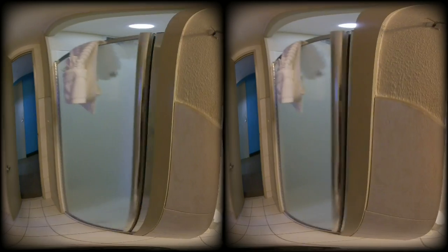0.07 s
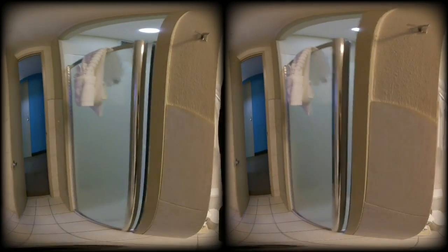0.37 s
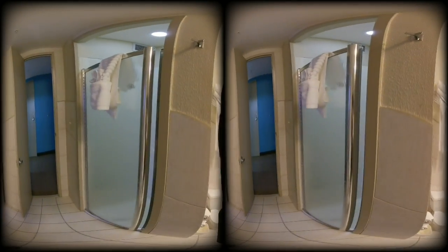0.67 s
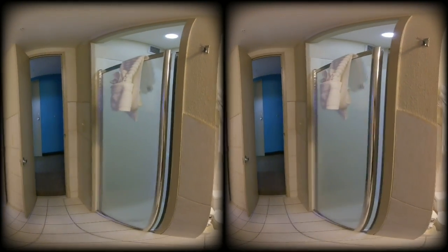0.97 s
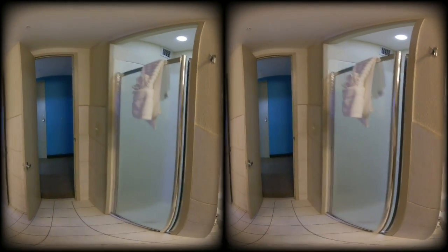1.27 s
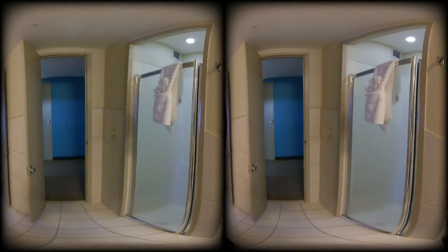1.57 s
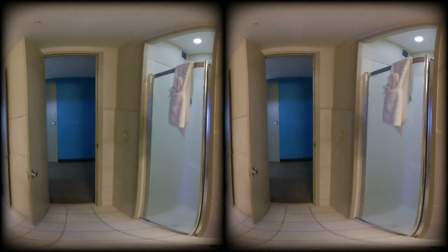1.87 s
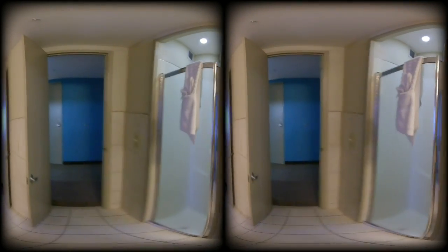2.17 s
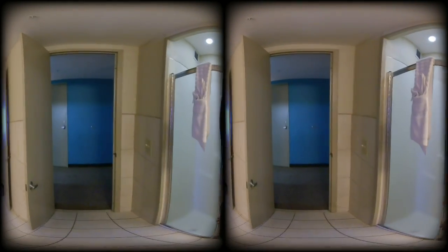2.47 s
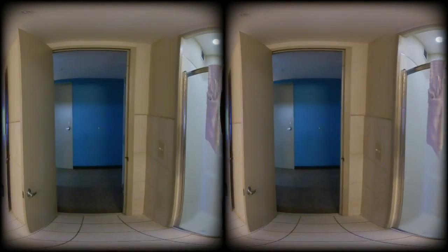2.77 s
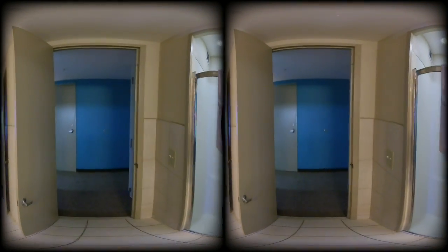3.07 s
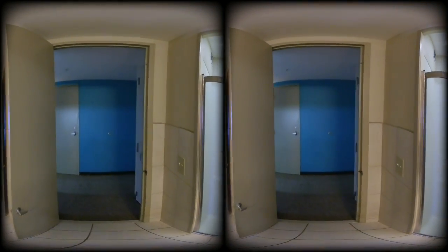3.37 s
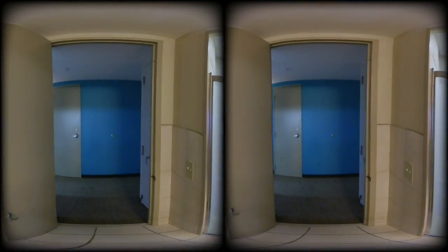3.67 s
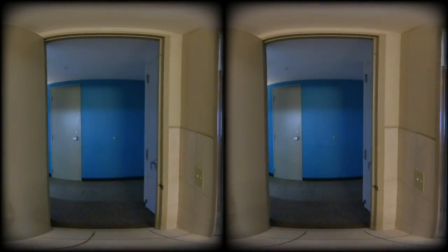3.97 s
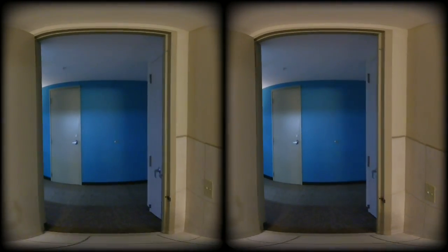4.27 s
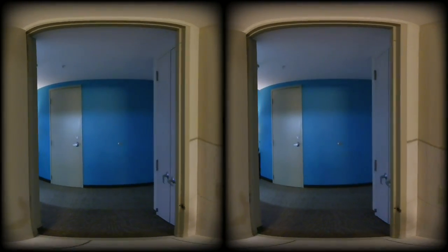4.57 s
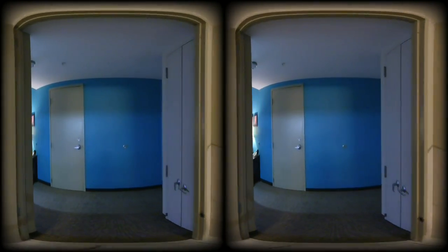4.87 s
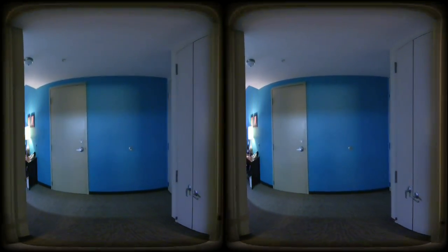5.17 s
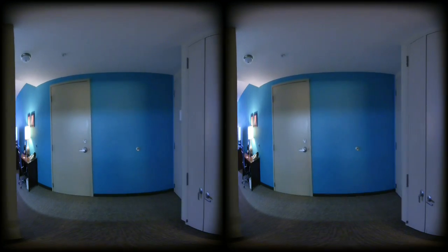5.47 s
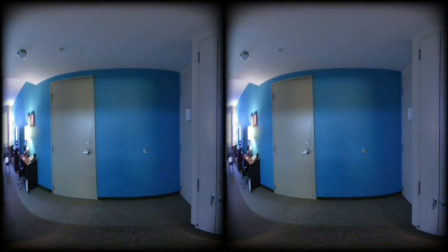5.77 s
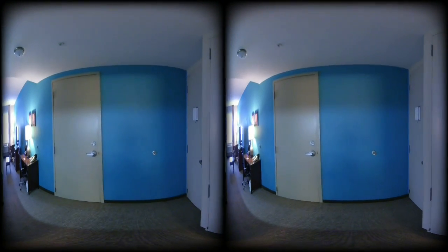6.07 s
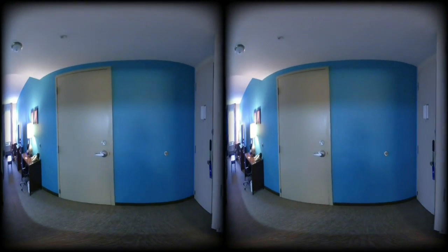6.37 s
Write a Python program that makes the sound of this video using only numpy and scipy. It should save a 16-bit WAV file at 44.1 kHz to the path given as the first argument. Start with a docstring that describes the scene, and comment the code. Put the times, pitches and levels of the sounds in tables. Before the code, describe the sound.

A quiet ventilation hum with rushing air runs throughout, easing slightly, heard from a hand-held stereo microphone in a tiled bathroom. After a faint scuff, a shower door clatters shut at about 0.2 seconds, the loudest sound: its steel catch snaps, its metal frame rattles, and duller rebounds die away by 0.5 seconds with a short, hard echo. From 0.9 to 2.4 seconds fingers click and rub softly on the microphone's case, close and slightly left. A soft step lands at 1 second, with faint scuffs near 2.2 and 3.2. At 3.6 seconds a wooden door knocks against its frame, nearly as loud, its latch snapping in and the room booming briefly. Quiet scuffs follow just after 4 seconds, then soft, slightly creaky steps from 4.7 to 5.2. Near 5.8 seconds come a light heel thud, a tiny sole squeak and a scuff on carpet.

```python
"""A slow walk out of a tiled bathroom, heard from the stereo microphones of a hand-held camera.
Ventilation hums from the start; close on the left, fingers rub and click on the case, and a sole scuffs.
At 0.2 s a shower door clatters shut, its steel catch and frame rattling in the hard room.
Soft steps follow. At 3.6 s a wooden door is knocked against its frame and its latch snaps in.
The air recedes, and near 5.8 s a sole squeaks and the walk reaches carpet."""
import sys
import numpy as np
from scipy import signal
from scipy.fft import rfft, irfft
from scipy.io import wavfile
from scipy.ndimage import uniform_filter1d

SR = 44100
rng = np.random.default_rng(int(sys.argv[2]) if len(sys.argv) > 2 else 0)


def inscribe(sig):
    """Save sig as 16-bit PCM at rate SR to the path in sys.argv[1].

    A 1-D sig is mono; a 2-D sig holds one channel per row.
    Samples are clipped to [-1, 1] before scaling.
    """
    pcm = np.round(np.clip(np.atleast_2d(sig).T, -1, 1) * 32767)
    wavfile.write(sys.argv[1], SR, pcm.astype(np.int16))


N = 282681
TIME = np.arange(N) / SR


def undb(db):
    """Decibels to gain."""
    return 10 ** (np.asarray(db) / 20)


def on_log_axis(hz, points):
    """Join (Hz, value) points by straight lines over log frequency."""
    f, value = np.transpose(points)
    return np.interp(np.log(np.maximum(hz, 1)), np.log(f), value)


def unit(x):
    """Scale to an average energy of one per channel."""
    return x / np.sqrt(np.mean(np.sum(x ** 2, axis=-1)))


def add(out, s, x, db, size=512):
    """Mix a stereo sound in at s seconds; db is the level of its loudest hundredth of a second."""
    start = max(int(s * SR), 0)
    loudest = np.sqrt(uniform_filter1d(np.mean(x ** 2, axis=0), size, mode="constant").max())
    out[:, start:start + x.shape[1]] += x[:, :N - start] * undb(db) / loudest


def pan(x, left_db):
    """Lean a sound toward the left microphone by a level difference."""
    return x * undb([[left_db / 2], [-left_db / 2]])


def through(x, response):
    """Convolve, channel by channel."""
    return signal.fftconvolve(np.atleast_2d(x), np.atleast_2d(response), axes=1)


def soften(x, hz):
    """Gentle low-pass: a softer contact pushes for longer."""
    return signal.lfilter(*signal.butter(1, min(hz, SR / 2 - 2000), fs=SR), x)


def thin(x, hz):
    """Gentle high-pass: a light touch hardly moves the whole panel."""
    return signal.lfilter(*signal.butter(1, hz, "high", fs=SR), x)


def high_pass(x, hz):
    """Remove what lies below hz."""
    return signal.sosfilt(signal.butter(3, hz, "high", fs=SR, output="sos"), x)


def body(points, size=4096):
    """Causal impulse response with the given (Hz, dB) spectrum."""
    gain = undb(on_log_axis(np.fft.rfftfreq(size, 1 / SR), points))
    cepstrum = irfft(np.log(gain))
    cepstrum[1:size // 2] *= 2
    cepstrum[size // 2 + 1:] = 0
    return unit(irfft(np.exp(rfft(cepstrum))))


def ring(modes):
    """One second of modes (Hz, energy in dB, t60: seconds to fall by 60 dB)."""
    t = np.arange(SR) / SR
    return sum(undb(db) * unit(np.sin(2 * np.pi * hz * t) * np.exp(-np.log(1000) * t / t60))
               for hz, db, t60 in modes)


def detune(modes, spread):
    """Each new contact shifts an object's modes a little."""
    shifts = rng.standard_normal(len(modes))
    return [(hz * (1 + spread * shift), db, t60) for (hz, db, t60), shift in zip(modes, shifts)]


def struck(spectrum, modes):
    """A blow's response: a broad crack plus the modes that ring on."""
    crack = body(spectrum)
    return np.pad(crack, (0, SR - len(crack))) + ring(modes)


def diffuse(size, side_db):
    """Stereo white noise; side_db lists its width as (Hz, side minus mid in dB) points."""
    ratio = undb(on_log_axis(np.fft.rfftfreq(size, 1 / SR), side_db))
    mid, side = rfft(rng.standard_normal((2, size))) / np.sqrt(1 + ratio ** 2)
    return irfft(np.array([mid + ratio * side, mid - ratio * side]), size)


def wander(rate_hz):
    """Smooth random drift with a spread near one."""
    hold = max(int(SR / rate_hz), 2)
    held = np.repeat(rng.standard_normal(N // hold + 1), hold)
    smooth = uniform_filter1d(uniform_filter1d(held, hold), hold)[:N]
    return smooth / smooth.std()


def slide_envelope(length_s, attack_s, release_s):
    """A surface presses down, slides for length_s and comes to rest."""
    t = np.arange(SR) / SR
    return np.minimum(t / attack_s, 1) * np.exp(-np.maximum(t - length_s, 0) / release_s)


def friction(envelope, grain_db, catch_db, size=128):
    """A swell of tiny uneven slips; the surface catches and lets go every few milliseconds."""
    slips, sizes, catches = rng.standard_normal((3, len(envelope)))
    grip = uniform_filter1d(catches, size) * np.sqrt(size)
    return slips * undb(grain_db * sizes + catch_db * np.tanh(grip)) * envelope


# The tiled room's decay. Each row: frequency in Hz, t60 in seconds.
ROOM_T60 = [(50, 1), (150, 0.62), (400, 0.72), (1200, 0.77), (3000, 0.75), (5500, 0.58), (9000, 0.5)]
# The room's width at the microphones. Each row: frequency in Hz, side minus mid in dB.
ROOM_WIDTH = [(50, -21.5), (150, -33.5), (500, -19.5), (1000, -9.5), (2200, -2), (4500, -1.5), (8500, -9)]


def reverb(liveness, bands=14):
    """The room's dense tail, treble dying first; liveness scales the decay times for the source's spot."""
    t, hz = np.arange(SR) / SR, np.fft.rfftfreq(SR, 1 / SR)
    noise, centres = rfft(diffuse(SR, ROOM_WIDTH)), np.geomspace(50, 10000, bands)
    tail = 0
    for centre, share in zip(centres, np.eye(bands)):
        band = irfft(noise * np.interp(hz, centres, share), SR)
        build_up = 1 - np.exp(-t / (0.0017 + 0.73 / centre))  # low modes need some cycles to fill
        t60 = liveness * on_log_axis(centre, ROOM_T60)
        tail = tail + band * build_up * np.exp(-np.log(1000) * t / t60)
    return unit(tail)


def room(direct_db, liveness, contact_s=0.00077, size=512):
    """Surfaces meet at many points: a short burst reaches the microphones, direct_db above the tail."""
    age = np.arange(size) / SR / contact_s
    direct = unit(diffuse(size, ROOM_WIDTH) * age * np.exp(-age))
    return reverb(liveness) + undb(direct_db) * np.pad(direct, ((0, 0), (0, SR - size)))


# Moving air at the microphones. Each row: frequency in Hz, level in dB.
AIR_SPECTRUM = [(25, -20), (60, -22), (100, -11), (135, -12.5), (168, -13.5), (200, -12), (240, -14.5),
                (330, -15), (500, -14), (1300, -14.5), (1650, -19.5), (2300, -25.5), (4500, -30.5),
                (9800, -34)]
# Stereo width of the steady hiss, nearly mono at the top.
# Each row: frequency in Hz, side minus mid in dB.
HISS_WIDTH = [(50, -19), (200, -13), (600, -10), (1200, -4), (2400, -2.5), (4500, 0.5), (7000, -16)]
# Duct resonances. Each row: frequency in Hz, width in Hz, starting level in dB, fade in dB per second.
DUCT_MODES = [(158.4, 4.3, -72.5, 1), (237, 7.7, -76, -0.73), (260.5, 14, -67, 3.5)]


def ventilation(start_db=-63.5, air_fade_db_per_s=0.65, steady_tone=0.35):
    """Rushing air keeps the duct humming unevenly; all fades with distance but one tone, which grows."""
    air_db = start_db - air_fade_db_per_s * TIME + 0.5 * wander(5.31)
    air = through(diffuse(N, HISS_WIDTH), body(AIR_SPECTRUM))[:, :N] * undb(air_db)
    hum = 0
    for hz, width_hz, db, fade_db_per_s in DUCT_MODES:
        waver = steady_tone + wander(2 * width_hz) + 1j * wander(2 * width_hz)
        tone = (waver * np.exp(2j * np.pi * hz * TIME)).real
        hum = hum + tone * undb(db - fade_db_per_s * TIME)
    return pan(air + hum, left_db=0.4)


# Strokes on the case. Each row: start in seconds, length in seconds, level in dB, cut-off in Hz.
RUBS = [(0.032, 0.0081, -58, 9100), (1.147, 0.061, -55.5, 14100), (1.218, 0.044, -51.5, 8000),
        (1.354, 0.079, -62, 2500), (1.495, 0.018, -58.5, 3960), (1.599, .06, -61, 4500),
        (1.685, 0.021, -56, 5500), (1.741, 0.038, -57, 10000), (1.975, 0.09, -57.5, 3500),
        (2.057, 0.0926, -51.5, 9900), (2.154, 0.13, -59, 6000), (2.292, 0.1, -63.5, 4000)]
# Clicks under the fingers. Each row: start in seconds, level in dB, contact cut-off in Hz.
CLICKS = [(0.8955, -44.5, 5800), (0.9216, -49, 16000), (1.704, -59, 3500), (1.9316, -53.5, 2510)]
# The plastic case's modes. Each row: frequency in Hz, level in dB, t60 in seconds.
CASE_MODES = [(1142, -23.5, 0.071), (1628, -23.5, 0.087), (2343, -13.5, 0.077), (3060, -19, 0.098),
              (4580, -20, 0.035)]
# Paths through the case to each microphone. Each row: frequency in Hz, level in dB.
CASE_LEFT = [(500, -26), (800, -17), (1080, 1.5), (1550, 4), (1750, 3.5), (2050, -22.5), (2500, -5.5),
             (3100, -1.5), (3700, -8), (4400, -2.5), (5300, -6.5), (6800, -12), (8200, -6), (10000, -17)]
CASE_RIGHT = [(500, -13), (850, -20), (1180, 6.5), (1450, 2.5), (1750, -17.5), (2100, -19.5), (2700, -0.5),
              (3100, -3.5), (3700, -14.5), (4600, -21.5), (10000, -33)]


def hand():
    """Rubs and clicks travel through the case to the microphones, too close to wake the room."""
    out = np.zeros((2, N))
    shell = np.array([body(CASE_LEFT), undb(-2.5) * body(CASE_RIGHT)])  # right is further from the hand
    for s, db, contact_hz in CLICKS:
        add(out, s, soften(disperse(shell, lag_s=0.0008), contact_hz), db)
    for s, length_s, db, bright_hz in RUBS:
        stroke = slide_envelope(length_s, attack_s=0.34 * length_s, release_s=0.018)
        slide = friction(stroke, grain_db=4.0, catch_db=2)
        singing = through(slide, ring(detune(CASE_MODES, spread=0.056)))[0, :len(slide)]
        add(out, s, through(soften(slide + singing, bright_hz), shell), db)
    return out


def disperse(x, lag_s):
    """Bending waves in a thin shell: treble arrives first, 1 kHz comes lag_s late."""
    khz = np.fft.rfftfreq(x.shape[-1], 1000 / SR)
    return irfft(rfft(x) * np.exp(-4000j * np.pi * lag_s * np.sqrt(khz)))


# Slides on the floor below the camera.
# Each row: start in seconds, length in seconds, level in dB, cut-off in Hz, attack in seconds.
SCUFFS = [(0.057, 0.071, -55, 2900, 0.037), (2.17, 0.13, -61, 4000, 0.039), (3.173, 0.088, -55, 2500, 0.02),
          (4.046, 0.1, -59, 3400, 0.023), (4.125, 0.061, -55.5, 2870, 0.018),
          (4.234, 0.078, -56.5, 5000, 0.023), (5.029, 0.18, -60.5, 8040, 0.077),
          (5.821, 0.017, -67, 8000, .02), (5.911, 0.054, -54, 6050, .016)]
# A sole on each surface. Each row: frequency in Hz, level in dB.
SOLE_ON_TILE = [(60, -9), (200, -16), (500, -4.5), (900, -2), (1200, 0), (1650, -1), (2100, -9),
                (2600, -5.5), (3350, -7), (3850, -12), (6500, -13.5), (10000, -21.5)]
SOLE_ON_CARPET = [(60, -14), (200, -20), (500, -8.5), (900, -2.5), (1250, 0), (1650, -0.5), (2000, -6),
                  (2600, -3.5), (3400, -2.5), (3850, -12.5), (6500, -17.5), (10000, -25)]


def scuffs(carpet_from_s=5.5):
    """Soles catch and slip between the steps, on tiles and then on carpet."""
    out, tile, carpet = np.zeros((2, N)), body(SOLE_ON_TILE), body(SOLE_ON_CARPET)
    for s, length_s, db, bright_hz, attack_s in SCUFFS:
        slide = friction(slide_envelope(length_s, attack_s, release_s=0.013), grain_db=3.0, catch_db=4.5)
        floor = through(carpet if s > carpet_from_s else tile, room(direct_db=4.0, liveness=1.0))
        add(out, s, through(soften(soften(slide, bright_hz), bright_hz), floor), db)
    return out


def door(blows, spectrum, modes, liveness):
    """A door meets its frame and rebounds; after each blow the door rings and the room booms."""
    out, response = np.zeros((2, N)), struck(spectrum, modes)
    for s, db, contact_hz, direct_db, low_cut_hz in blows:
        blow = thin(soften(response, contact_hz), low_cut_hz)
        add(out, s, through(blow, room(direct_db, liveness)), db)
    return out


# The shower door, near centre: the catch ticks, the door slams, the pane rebounds.
# Each row: start in seconds, level in dB, direct sound in dB, low cut in Hz.
SHOWER_BLOWS = [(0.1633, -54, 16, 2500), (0.1672, -49.5, 12.5, 347), (0.1707, -48, 14.5, 600),
                (.183, -45, -6, 250), (.192, -51, 7.5, 298), (.205, -53, -0.5, 200.4),
                (.2150, -28, -15, 30.4), (0.2294, -25.5, -0.5, 30), (0.2407, -34.5, -2.5, 120),
                (.262, -35.5, -7.5, 60), (0.2676, -32.5, 2.5, 90), (.2745, -33.5, 0, 149),
                (0.378, -37.5, 16, 200), (0.457, -52, -11, 250), (0.485, -45.5, -16, 350)]
# Its crack. Each row: frequency in Hz, level in dB.
SHOWER_CRACK = [(21, -20.5), (35, -15.5), (59, 0), (120, -10), (216, 1), (294, -5), (610, -5.5), (840, -1),
                (1620, -3.5), (2200, -13), (3060, -12.5), (3500, -16.5), (5940, -15.5), (8680, -12),
                (10000, -16.5), (13000, -57.5), (22000, -120)]
# The door's ring and the room's low boom after each blow.
# Each row: frequency in Hz, level in dB, t60 in seconds.
SHOWER_AND_ROOM_MODES = [(48.4, -21, 0.45), (119, -28, 0.065), (218, -27.5, 0.2), (333, -23, .7),
                         (472, -29, 0.42), (961, -26, 0.011), (1160, -19, 0.0093), (2930, -18, 0.011)]


def shower_door(slam_s=0.22, hardest_hz=11000, softest_hz=1470, halving_s=0.024):
    """Contact is hard up to the slam; after it the rebounds grow softer and duller."""
    blows = []
    for s, db, direct_db, low_cut_hz in SHOWER_BLOWS:
        contact_hz = hardest_hz * 0.5 ** (max(s - slam_s, 0) / halving_s)
        blows.append((s, db, max(contact_hz, softest_hz), direct_db, low_cut_hz))
    return pan(door(blows, SHOWER_CRACK, SHOWER_AND_ROOM_MODES, liveness=1.02), left_db=-0.4)


def chinks(hits, modes):
    """A small steel part strikes its plate; each mode beams its own way and carries into the room."""
    out = np.zeros((2, N))
    for s, db, direct_db in hits:
        partials = [ring([mode]) for mode in detune([mode[:3] for mode in modes], spread=0.012)]
        direct = sum(pan(partial, left_db=mode[3]) for partial, mode in zip(partials, modes))
        tail = through(sum(partials), reverb(liveness=0.85))[:, :SR]
        add(out, s, undb(direct_db) * direct + tail, db)
    return out


# The catch's snaps. Each row: start in seconds, level in dB, direct sound in dB.
CATCH_HITS = [(.2225, -34, 0.75), (.2285, -31, 3), (.2665, -38, 4), (.279, -45, 4)]
# Its modes. Each row: frequency in Hz, level in dB, t60 in seconds, left minus right in dB.
CATCH_MODES = [(3130, -2, .015, -10), (3580, 3, 0.018, 0), (3830, 1, .015, 0.5), (4300, 1.5, 0.012, -0.5),
               (4640, -5, 0.012, 0.5), (6800, -10.5, 0.006, -0.5), (8470, -3.5, .012, 0)]


def shower_catch():
    """The shower door's steel catch snaps against its plate."""
    return chinks(CATCH_HITS, CATCH_MODES)


def frame_rattle():
    """After the slam the shower door's loose metal frame chatters brightly and settles."""
    envelope = slide_envelope(length_s=0.046, attack_s=0.0072, release_s=0.021)
    chatter = high_pass(friction(envelope, grain_db=2.5, catch_db=3), hz=5000)
    out = np.zeros((2, N))
    add(out, 0.228, through(chatter, room(direct_db=8, liveness=0.65)), db=-39.5)
    return out


# Heels landing below the camera.
# Each row: start in seconds, level in dB, creak in Hz, thud against creak in dB, direct sound in dB.
STEPS = [(1.0124, -53.5, 620, 9, -5.5), (1.044, -61, 500, -4, 3), (4.741, -64, 1570, -15, -14),
         (4.81, -52.5, 1110, 8, -3), (4.8849, -50, 1470, -24, -8), (4.918, -62.5, 1380, -22, -9),
         (4.962, -60, 1540, -19, 5), (5.175, -59, 830, -6.5, 4), (5.655, -71, 550, -11, 3),
         (5.7625, -61.5, 1110, 12, -1)]
# A heel's thud. Each row: frequency in Hz, level in dB.
HEEL_THUD = [(40, -24), (80, -24), (230, 13), (500, 2), (1000, 0), (1600, 2.5), (2200, -19), (3200, -4),
             (5000, -44), (10000, -64)]
# The floor's boom. Each row: frequency in Hz, level in dB, t60 in seconds.
FLOOR_MODES = [(242, -4, 0.083), (122, -21.5, 0.053)]


def footsteps(creak_t60_s=0.0043, contact_hz=2650):
    """Heels thud and make the floor boom and creak; a creak is a broad, short resonance."""
    out, thud, sole = np.zeros((2, N)), struck(HEEL_THUD, FLOOR_MODES), body(SOLE_ON_TILE)
    for s, db, creak_hz, thud_db, direct_db in STEPS:
        creak = unit(through(ring([(creak_hz, 0, creak_t60_s)]), sole)[0, :len(thud)])
        step = soften(creak + undb(thud_db) * thud, contact_hz)
        add(out, s, through(step, room(direct_db, liveness=0.81)), db)
    return out


# The wooden door, further along the walk.
# Each row: start in seconds, level in dB, contact cut-off in Hz, direct sound in dB, low cut in Hz.
WOOD_BLOWS = [(3.566, -34, 11000, -10, 900), (3.5722, -30.5, 4940, -6.5, 200), (3.5862, -32.5, 2980, 2, 60),
              (3.5995, -34, 1480, 11, 250), (3.634, -35, 1100, -1.5, 40), (3.697, -38.5, 1100, 2.5, 60),
              (3.765, -44.5, 6500, -5, 90), (3.785, -48.5, 14000, -1.5, 200)]
# Its crack. Each row: frequency in Hz, level in dB.
WOOD_CRACK = [(21, -47), (35, -2), (102, -12.5), (145, -12), (202, -7.5), (324, -11), (420, -5.5),
              (690, -10.5), (961, -1), (1620, -11), (2250, -19.5), (3290, -14), (4690, -20.5), (7890, -20),
              (10000, -20.5), (13000, -45), (22000, -120)]
# The door's ring and the room's low boom after each blow.
# Each row: frequency in Hz, level in dB, t60 in seconds.
WOOD_AND_ROOM_MODES = [(57.3, -23, 0.99), (165.3, -16, 0.55), (325.5, -15, 0.6), (501, -22, 0.5),
                       (1000, -26, 0.037), (1290, -13, 0.012), (1543, -16.5, 0.055)]


def wooden_door():
    """The wooden door knocks against its frame and sets the room booming."""
    return pan(door(WOOD_BLOWS, WOOD_CRACK, WOOD_AND_ROOM_MODES, liveness=0.84), left_db=0.5)


# The latch's hits, more direct than room. Each row: start in seconds, level in dB, direct sound in dB.
LATCH_HITS = [(3.5658, -34.5, 14), (3.5785, -46, 8), (3.587, -41.5, 5.2), (3.608, -47, 11),
              (3.626, -44.5, 5)]
# Its modes. Each row: frequency in Hz, level in dB, t60 in seconds, left minus right in dB.
LATCH_MODES = [(3125, 3.5, 0.025, -7), (4130, -23, 0.014, 0), (4396, -0.5, 0.041, 16), (6230, -21, .01, 0),
               (8060, -26, .008, -3)]


def door_latch():
    """The wooden door's steel latch snaps in and rattles."""
    return chinks(LATCH_HITS, LATCH_MODES)


# A squeak underfoot, dead centre.
# Each row: start in seconds, length in seconds, level in dB, first pitch in Hz, last pitch in Hz.
SQUEAKS = [(5.767, 0.023, -66, 1436, 1795)]


def sole_squeak(glide_s=0.0112):
    """A sole grips and sings for a moment, its pitch rising quickly and levelling off."""
    out, t = np.zeros((2, N)), np.arange(SR) / SR
    for s, length_s, db, start_hz, end_hz in SQUEAKS:
        glide_hz = end_hz + (start_hz - end_hz) * np.exp(-t / glide_s)
        hz = glide_hz * (1 + 0.025 * wander(310)[:SR])
        envelope = slide_envelope(length_s, attack_s=0.0039, release_s=0.0054)
        tone = np.sin(2 * np.pi * np.cumsum(hz) / SR) * envelope
        add(out, s, tone + undb(-3) * through(tone, reverb(liveness=0.6))[:, :SR], db)
    return out


def scene():
    """At the microphones: both doors with their fittings, the walker and the air."""
    doors = shower_door() + wooden_door()
    fittings = shower_catch() + frame_rattle() + door_latch()
    walker = footsteps() + scuffs() + sole_squeak() + hand()
    return doors + fittings + walker + ventilation()


def record(dry):
    """The camera drops the deepest rumble and cuts the top."""
    top_cut = signal.ellip(10, 0.2, 70, 10050, fs=SR, output="sos")
    return signal.sosfilt(top_cut, high_pass(dry, hz=39))


dry = scene()
out = record(dry)
inscribe(out)
```